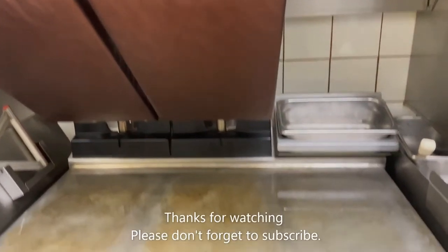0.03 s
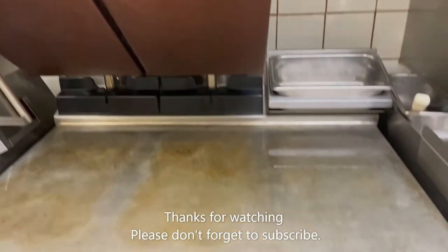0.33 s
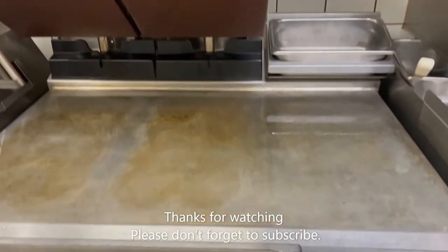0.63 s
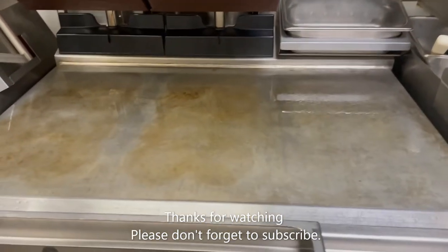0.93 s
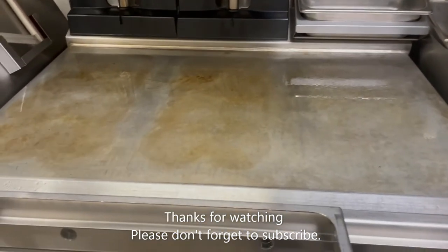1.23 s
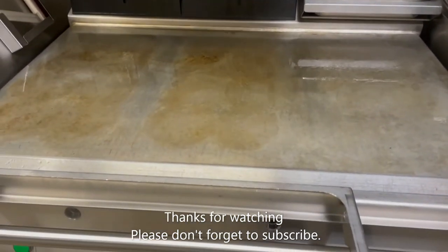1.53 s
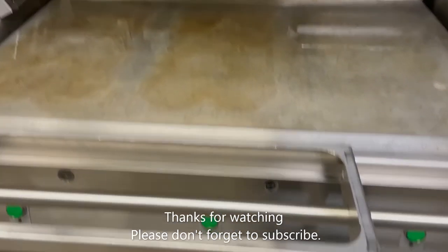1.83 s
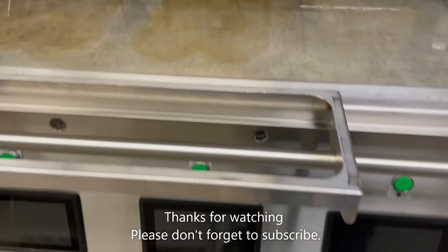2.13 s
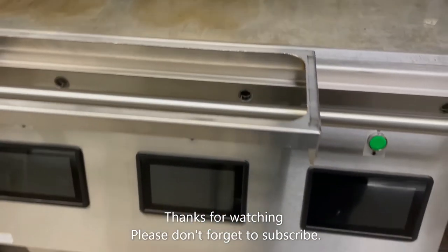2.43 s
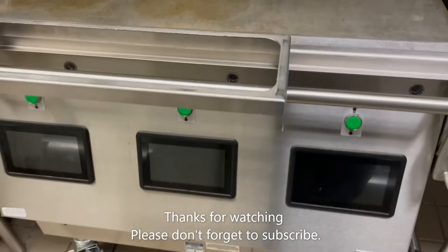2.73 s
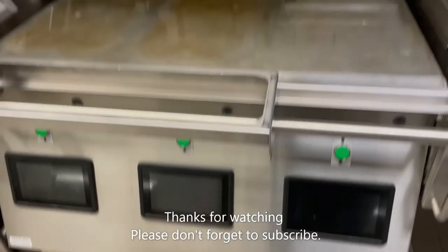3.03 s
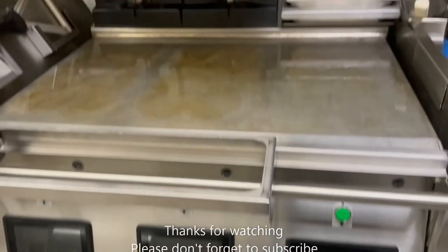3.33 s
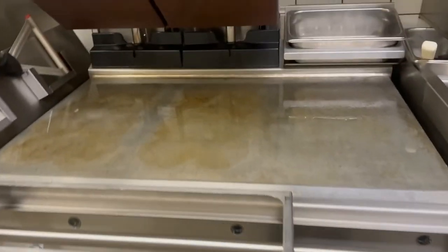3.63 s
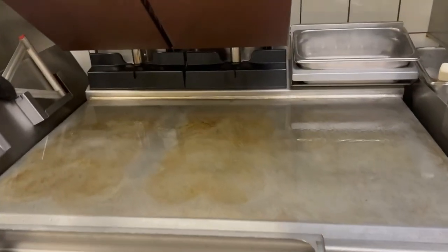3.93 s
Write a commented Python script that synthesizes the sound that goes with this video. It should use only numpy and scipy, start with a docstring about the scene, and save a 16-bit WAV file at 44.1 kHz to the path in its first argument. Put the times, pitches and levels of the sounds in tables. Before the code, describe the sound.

An extraction hood's fans hum over rushing air in a tiled kitchen. Handling rumble and soft thuds hit the moving microphone early, a hollow whir rises, then the rumble returns. Light metallic ticks and tiny clicks are scattered throughout.

```python
"""A tiled commercial kitchen, on a walk along the griddle. Air rushes through the extraction hood
and the fans hum, their blade tones beating against each other; a hollow whir swells by the front panel.
A hand rubbing and bumping the microphone's casing brings two stretches of low rumble with dull thuds.
Three sharp metallic ticks ring briefly in the room, among a small clink, faint scuffs and tiny clicks."""
import sys
import numpy as np
from scipy import signal
from scipy.fft import rfft, irfft
from scipy.io import wavfile
from scipy.ndimage import uniform_filter1d

SR = 44100
rng = np.random.default_rng(int(sys.argv[2]) if len(sys.argv) > 2 else 0)


def generate_wav(sig):
    """Save sig (samples, or channels by samples) to the path in sys.argv[1] as 16-bit PCM at SR."""
    pcm = np.round(np.clip(np.atleast_2d(sig).T, -1, 1) * 32767).astype(np.int16)
    wavfile.write(sys.argv[1], SR, pcm)


N = 176400
T = np.arange(N) / SR
HZ = np.maximum(np.arange(N // 2 + 1) * SR / N, 1)


# Colour of the air in the hood. Each row: frequency in Hz, level in dB per Hz.
AIR_SPECTRUM = [(20, -51), (32, -57), (45, -59), (62, -57.5), (90, -64.5), (130, -66.5), (156, -58),
                (200, -63), (230, -60.5), (282, -55), (330, -63), (395, -60.5), (450, -65), (550, -66.5),
                (600, -63), (680, -69), (755, -63), (830, -70), (885, -66.5), (1060, -73.5), (1160, -67.5),
                (1280, -74), (1400, -74), (2000, -80), (3000, -86), (5000, -91.5), (7000, -98),
                (10500, -107), (13000, -112), (15000, -119)]
# EQ ride along the walk. Each row: time in seconds, mid gain in dB, treble gain in dB.
AIR_EQ_RIDE = [(0, 1.5, -5), (.7, -1, -1.5), (1.1, 0.5, -1), (1.7, -0.5, -2), (2.3, 0, -2),
               (2.75, -0.5, -2.5), (3.05, 0, -1.5), (3.5, 2, -2), (4, 1, 1.5)]

def hood_air(mid_hz=300, treble_hz=4500):
    """Turbulent air rushes through the hood; its mids and treble shift as the microphone moves."""
    air = rfft(noise(AIR_SPECTRUM))
    above_bass = 1 / (1 + (mid_hz / HZ) ** 4)
    treble_share = 1 / (1 + (treble_hz / HZ) ** 2)
    bass = irfft(air * (1 - above_bass), N)
    mids = irfft(air * above_bass * (1 - treble_share), N)
    treble = irfft(air * above_bass * treble_share, N)
    mid_db, treble_db = automation(AIR_EQ_RIDE)
    return bass + from_db(mid_db) * mids + from_db(treble_db) * treble


# Fader ride on the main hum, dipping as the microphone moves through the room.
# Each row: time in seconds, gain in dB.
HUM_RIDE = [(0, -30), (.5, -31), (.65, -38), (.77, -29.5), (1.0, -31), (1.4, -33), (1.67, -36.5),
            (1.82, -30), (2.05, -32), (2.11, -40.5), (2.22, -28), (2.38, -32), (2.48, -27), (2.58, -31.5),
            (2.69, -24.5), (2.77, -28.5), (3.2, -28.5), (4, -28.5)]
# Weaker fan and motor tones. Each row: pitch in Hz, far level in dB, near level in dB,
# fluttering share from 0 to 1, left minus right in dB.
FAN_TONES = [(119.1, -43.5, -42, 0.23, -5.5), (240.7, -44, -44.5, 0.06, -2), (250, -43, -39.5, 0.06, -4),
             (258.1, -40, -44, 0.16, -4), (495.7, -48.5, -43.5, 0.6, 5), (517.5, -49.5, -42, 0.3, -2),
             (741.7, -49, -46, 0.11, -1), (766, -55, -55, .4, 6), (995, -61.5, -54, 0.6, -6),
             (1017, -57.5, -55.5, 0.6, -3.5), (1251, -56, -57, 0.9, -8)]

def fans():
    """The main fan hums among weaker tones; those close in pitch beat against each other."""
    hum_db, = automation(HUM_RIDE)
    hum = from_db(hum_db) * fan_tone(254, far_db=-3.5, near_db=-2.5, flutter_share=0, pan_db=-3)
    return hum + sum(fan_tone(*row) for row in FAN_TONES)


def fan_tone(hz, far_db, near_db, flutter_share, pan_db, flutter_hz=11.4, speed_wander=.0005):
    """One fan or motor: a steady tone plus a fluttering part that the room spreads between the ears."""
    mid, side = [rms_one(drift(flutter_hz) + 1j * drift(flutter_hz)) for _ in range(2)]
    width = np.interp(hz, HZ, colour(STEREO_WIDTH))
    flutter = mid + width * side * [[1], [-1]]
    amplitude = np.sqrt(1 - flutter_share) + np.sqrt(flutter_share) * flutter
    cycles = hz * T + np.cumsum(speed_wander * hz * drift(1.6)) / SR + rng.random()
    nearness = np.interp(T, (2.4, 2.41), [0, 1])   # the microphone goes from far to near
    level = from_db(far_db + (near_db - far_db) * nearness + pan_db * np.array([[.5], [-.5]]))
    return level * np.sqrt(2) * np.real(amplitude * np.exp(2j * np.pi * cycles))


# Swell of the whir. Each row: time in seconds, level in dB.
WHIR_RIDE = [(1.9, -59), (2.3, -42), (2.8, -41), (3.1, -40.5), (3.4, -43.5), (4, -53)]
# Its hollow colour. Each row: frequency in Hz, relative level in dB.
WHIR_SPECTRUM = [(250, -29.5), (380, -1), (470, 3.5), (520, 4), (600, -4.5), (800, -9.5), (1000, -7.5),
                 (1150, -3.5), (1280, 0.5), (1400, -27), (2500, -48)]

def panel_whir():
    """A hollow whir comes up close to the front panel, then falls away."""
    whir_db, = automation(WHIR_RIDE)
    return from_db(whir_db) * rms_one(noise(WHIR_SPECTRUM))


# Fader rides on the handling noise. Each row: time in seconds, rumble gain in dB, hiss level in dB.
RUB_RIDE = [(0, -37, -78), (.16, -46, -81), (.67, -43, -83), (.7, -27.5, -80), (1.0, -28, -77),
            (1.06, -24, -68), (1.12, -30.5, -74), (1.18, -19.5, -67), (1.27, -27.5, -73), (1.37, -52, -80),
            (3.02, -51, -86), (3.07, -25.5, -72), (3.16, -18, -59), (3.33, -28, -61), (3.48, -20, -62),
            (3.62, -25, -57), (3.78, -26, -61), (3.86, -23, -63), (4, -24.5, -60)]
# Extra ride on the rumble's body, above the split. Each row: time in seconds, gain in dB.
RUMBLE_BODY_RIDE = [(1.0, -1), (1.2, 2), (3.1, -8), (3.5, -2), (4, 0.5)]
# Colours of the deep rumble and the thin hiss. Each row: frequency in Hz, relative level in dB.
RUMBLE_SPECTRUM = [(20, -45), (40, -27), (60, -7.5), (85, 0), (110, 2.5), (145, -7.5), (200, -14.5),
                   (300, -16.5), (450, -26.5), (750, -34), (1200, -49), (2000, -73)]
HISS_SPECTRUM = [(800, 6), (2200, 5), (3800, -0.5), (6000, -3.5), (9000, -3), (12000, -13.5),
                 (16000, -13.5)]

def hand_rub(split_hz=190):
    """Friction on the casing: a deep drone, a body that varies with the grip, a hiss of skin or cloth."""
    rumble_db, hiss_db = automation(RUB_RIDE)
    body_db, = automation(RUMBLE_BODY_RIDE)
    friction = rfft(firm_grip(noise(RUMBLE_SPECTRUM)))
    body_share = 1 / (1 + (split_hz / HZ) ** 6)
    drone = irfft(friction * (1 - body_share), N)
    body = from_db(body_db) * irfft(friction * body_share, N)
    hiss = rms_one(noise(HISS_SPECTRUM))
    return from_db(rumble_db) * (drone + body) + from_db(hiss_db) * hiss


def firm_grip(friction, evenness=.85, window_s=.03):
    """Steady pressure evens out the swells of friction noise; rms 1."""
    power = uniform_filter1d(np.mean(friction ** 2, axis=0), size=int(window_s * SR))
    return rms_one(friction / (power + 0.046 * power.mean()) ** (evenness / 2))


# Dull bumps of the hand. Each row: start in seconds, level in dB, pitch as a ratio to the modes.
HAND_BUMPS = [(.012, -30.5, .72), (0.699, -22, 0.86), (1.052, -19.5, 0.96), (1.15, -26, 0.83),
              (1.176, -13, .95), (1.199, -10.5, .88), (1.229, -18, .85), (3.066, -26, 1.16),
              (3.15, -16.5, 1.1), (3.19, -23, 0.94), (3.272, -23, 0.8), (3.552, -23, 1)]
# Low modes of the casing. Each row: frequency in Hz, gain in dB, time to fall 60 dB in seconds.
CASING_MODES = [(53.7, -17, 0.25), (71.7, -2.5, 0.28), (107.8, 4, 0.1), (190, -8, 0.16)]

def hand_bumps(lowpass_hz=237):
    """Soft bumps set the casing's low modes ringing, in a slightly different balance each time."""
    thuds = np.zeros(N)
    for start, db, pitch in HAND_BUMPS:
        age = np.maximum(T - start, 0)
        for hz, mode_db, t60 in CASING_MODES:
            envelope = from_db(db + mode_db + rng.normal(0, 1) - 60 * age / t60)
            thuds += envelope * np.sin(2 * np.pi * pitch * hz * age)
    return signal.sosfilt(signal.butter(2, lowpass_hz, fs=SR, output="sos"), thuds)


# Sharp metallic ticks. Each row: start in seconds, level in dB, contact length in seconds, body minus
# top in dB, lower ring in Hz, upper ring in Hz, time for the room tail to fall 60 dB in seconds.
METAL_TICKS = [(0.475, -46, .02, -0.5, 2350, 4530, 0.33), (1.474, -41, 0.0069, 0.5, 3370, 4430, 0.23),
               (2.906, -44, 0.022, -1.5, 2480, 5010, 0.26)]
# Colours of a tick's body and its bright top. Each row: frequency in Hz, relative level in dB.
TICK_BODY_SPECTRUM = [(700, -12), (1700, -0.5), (2500, 3.5), (3300, 3), (4500, -1.5), (5400, -4.5),
                      (6400, -1.5), (7200, -3), (8500, -6.5), (10000, -8)]
TICK_TOP_SPECTRUM = [(6000, -28), (8500, -2), (9500, -3), (11000, -4), (13000, -14.5), (15500, -1)]

def metal_ticks(grit_db=4, ring_db=-6.5, contact_t60_s=0.031, room_db=-0.5, room_lowpass_hz=12500):
    """A short gritty contact on metal, then the duller tail of the tiled room."""
    grit = rms_one(from_db(grit_db * drift(500)))
    body, top = rms_one(noise(TICK_BODY_SPECTRUM)), rms_one(noise(TICK_TOP_SPECTRUM))
    ticks = np.zeros((2, N))
    for start, db, length, body_db, low_hz, high_hz, room_t60 in METAL_TICKS:
        rings = ringing(low_hz, width_hz=260) + ringing(high_hz, width_hz=260)
        metal = top + from_db(body_db) * (body + from_db(ring_db) * rings)
        # Reversed, the noise keeps its colour but is unrelated to the contact.
        diffuse = irfft(rfft(metal[:, ::-1]) / (1 + (HZ / room_lowpass_hz) ** 10), N)
        attack = np.clip((T - start) / (0.61 * length), 0, 1)
        since_release = np.maximum(T - start - length, 0)
        contact = grit * from_db(-60 * since_release / contact_t60_s) * metal
        tail = from_db(room_db - 60 * since_release / room_t60) * diffuse
        ticks += from_db(db) * attack * (contact + tail)
    return ticks


# A small clink among the first bumps. Each row: start in seconds, level in dB.
METAL_CLINKS = [(1.178, -42)]

def clink(rattle_db=5):
    """A light, rattling touch of metal that dies away quickly."""
    rattle = rms_one(from_db(rattle_db * drift(150)))
    return decays(METAL_CLINKS, t60_s=0.12) * rattle * ringing(4200, width_hz=380)


# Faint scuffs. Each row: peak time in seconds, friction level in dB, half length in seconds,
# rasp level in dB.
SCUFF_SWELLS = [(0.127, -41.5, 0.018, -43.5), (1.2, -36, 0.03, -47), (3.15, -41.5, 0.028, -52.5),
                (3.509, -47, 0.066, -50.5)]
# Colour of their soft friction. Each row: frequency in Hz, relative level in dB.
SCUFF_SPECTRUM = [(250, -8), (350, 8), (500, 7), (720, 14), (1000, -0.5), (1600, -0.5), (2600, -5),
                  (3400, -13), (5000, -13.5), (7000, -18.5), (12000, -30.5), (16000, -32)]

def scuffs():
    """Soft swells of friction noise, each with its own share of resonant rasp."""
    friction, rasp = rms_one(noise(SCUFF_SPECTRUM)), ringing(2160, width_hz=380)
    swells = np.zeros((2, N))
    for peak_s, db, half_s, rasp_db in SCUFF_SWELLS:
        envelope = 1 / (1 + ((T - peak_s) / half_s) ** 2)
        swells += envelope * (from_db(db) * friction + from_db(rasp_db) * rasp)
    return swells


# Tiny clicks close by. Each row: start in seconds, level in dB.
DRY_CLICKS = [(.3475, -51), (1.069, -49), (2.701, -50), (2.858, -44), (3.0146, -45), (3.13, -53)]
# Their crisp colour. Each row: frequency in Hz, relative level in dB.
CLICK_SPECTRUM = [(1000, -8.5), (2500, 1), (7400, 7), (8200, -10), (10000, -15), (16000, -23)]

def clicks():
    """Dry specks of noise a few milliseconds long."""
    return rms_one(noise(CLICK_SPECTRUM)) * decays(DRY_CLICKS, t60_s=.022)


# Stereo image; the two microphone ports are in opposite phase near 8 and 15 kHz.
# Each row: frequency in Hz, side minus mid in dB.
STEREO_WIDTH = [(60, -25), (200, -7), (280, -9), (400, -5.5), (750, -4), (1000, -1.5), (2400, -2.5),
                (4400, -2.5), (6200, -4), (7400, 2), (7850, 23.5), (8700, 20), (9200, 1.5), (10000, -3.5),
                (12000, -25.5), (13500, 2), (14500, 21.5)]

def noise(spectrum):
    """Stereo noise with the given density, shared between mid and side by the stereo width."""
    mid, side = rfft(rng.standard_normal((2, N))) * np.sqrt(SR / 2) * colour(spectrum)
    width = colour(STEREO_WIDTH)
    return irfft(np.array([mid + width * side, mid - width * side]) / np.hypot(1, width), N)


def ringing(hz, width_hz):
    """A narrow band of noise, like close metal modes heard through the room; rms 1."""
    white = rfft(rng.standard_normal((2, N)))
    return rms_one(irfft(white / (1 + ((HZ - hz) / width_hz) ** 2), N))


def drift(rate_hz):
    """Random motion from 1 Hz up to about the given rate; rms 1."""
    white = rfft(rng.standard_normal(N))
    return rms_one(irfft(white * (HZ > 1) / (1 + (HZ / rate_hz) ** 4), N))


def decays(hits, t60_s):
    """An envelope that jumps up at each hit and dies away."""
    return sum((T >= start) * from_db(db - 60 * np.maximum(T - start, 0) / t60_s) for start, db in hits)


def automation(ride, smooth_s=.012):
    """Each lane of a ride at every sample, with rounded corners."""
    times, *lanes = np.transpose(ride)
    return [uniform_filter1d(np.interp(T, times, lane), size=int(smooth_s * SR)) for lane in lanes]


def colour(points):
    """Gain at every frequency from points in Hz and dB."""
    hz, db = np.transpose(points)
    return from_db(np.interp(np.log(HZ), np.log(hz), db))


def from_db(db):
    """Decibels to gain."""
    return 10 ** (np.asarray(db) / 20)


def rms_one(x):
    """Scale to unit rms."""
    return x / np.sqrt(np.mean(np.abs(x) ** 2) + 1e-20)


def scene():
    """Ventilation, handling and small noises together."""
    ventilation = hood_air() + fans() + panel_whir()
    handling = hand_bumps() + hand_rub()
    return ventilation + handling + metal_ticks() + clink() + scuffs() + clicks()


def record(dry):
    """The microphone's low cut, then a steep cut of the top."""
    low_cut = signal.butter(4, 52.7, "high", fs=SR, output="sos")
    top_cut = signal.ellip(10, .1, 80, 15800, fs=SR, output="sos")
    return signal.sosfilt(top_cut, signal.sosfilt(low_cut, dry))


dry = scene()
out = record(dry)
generate_wav(out)
```